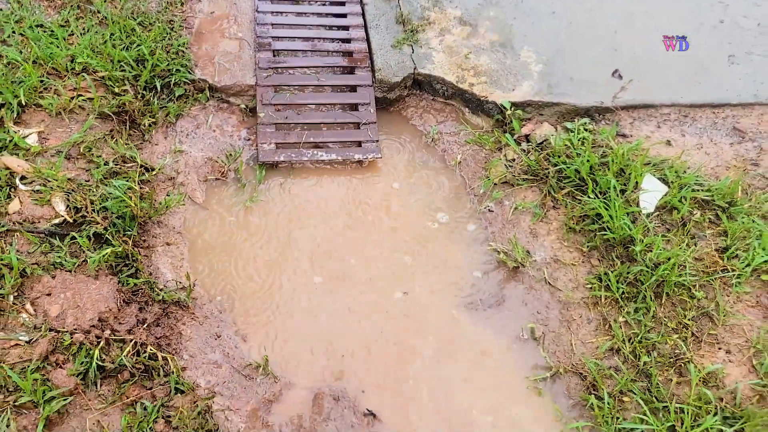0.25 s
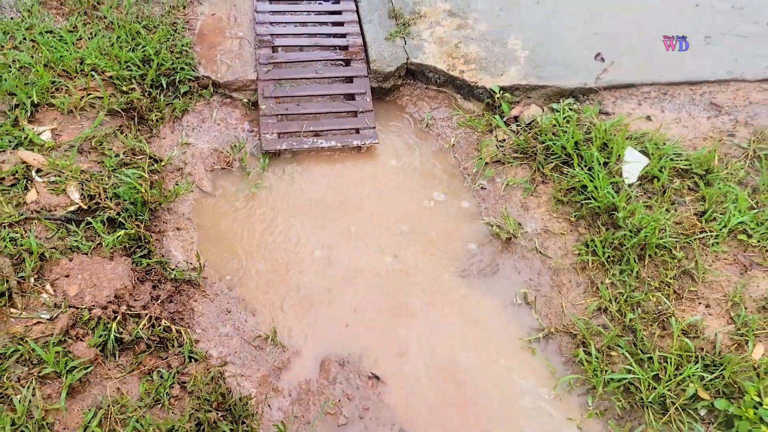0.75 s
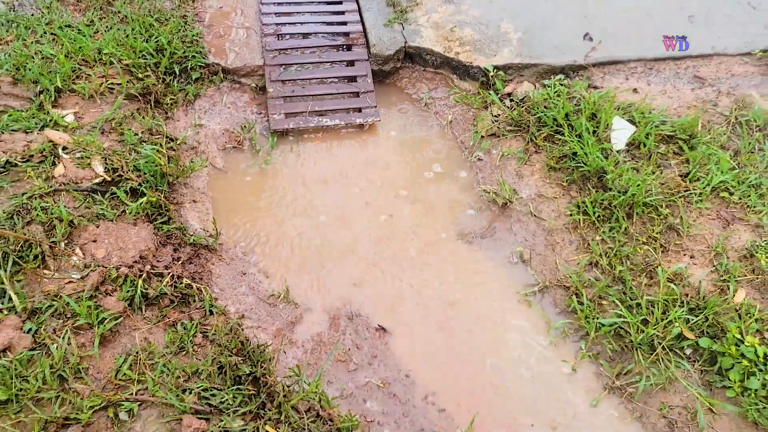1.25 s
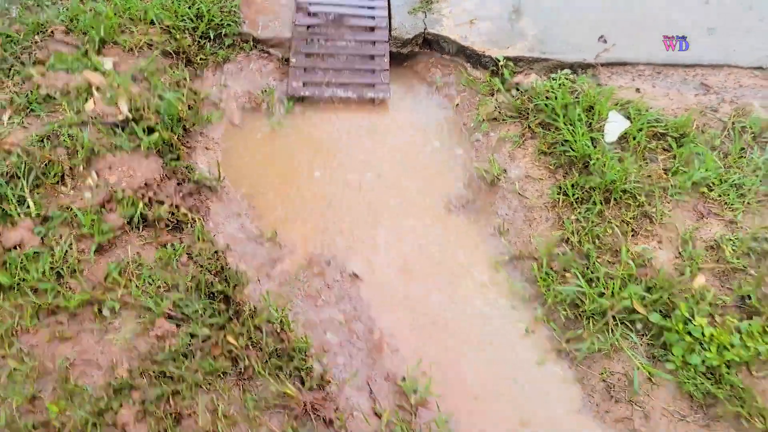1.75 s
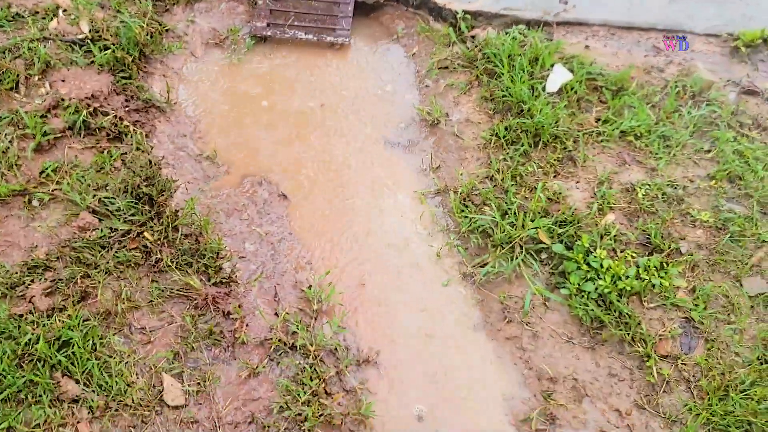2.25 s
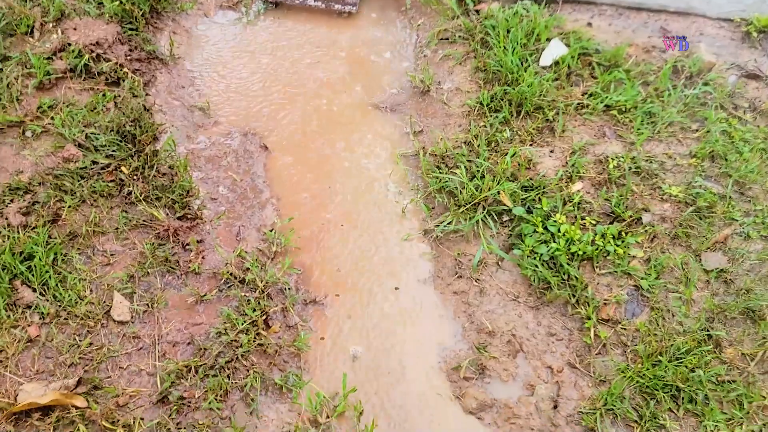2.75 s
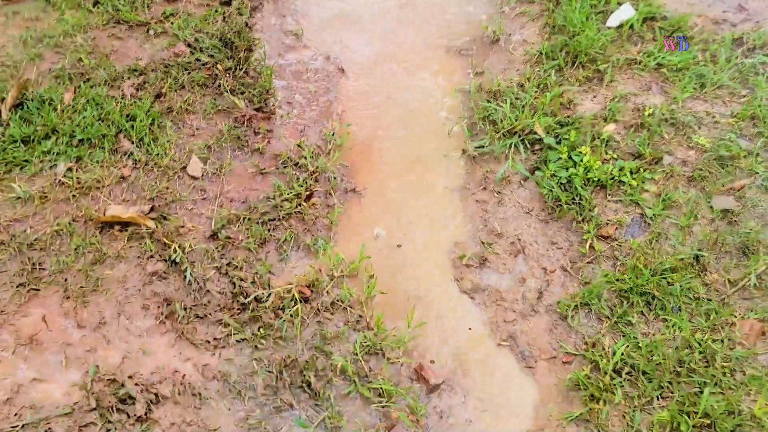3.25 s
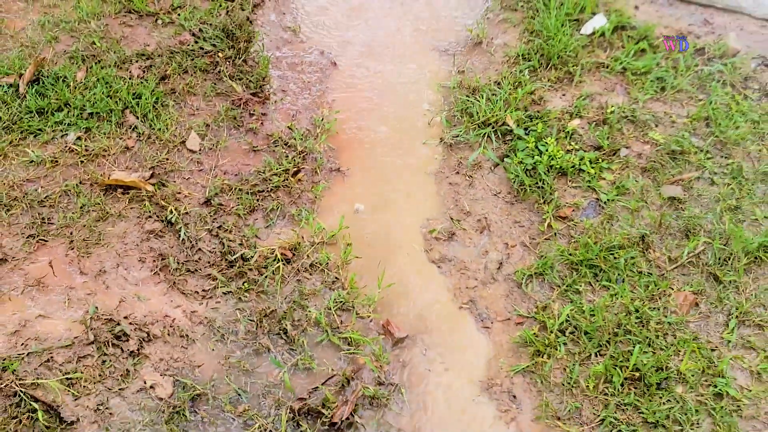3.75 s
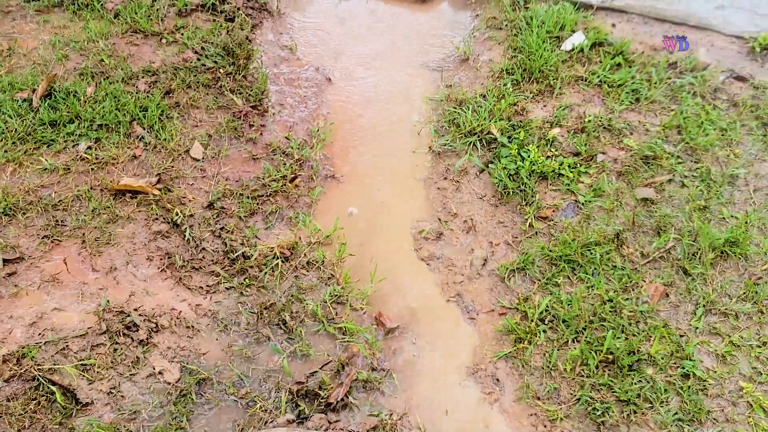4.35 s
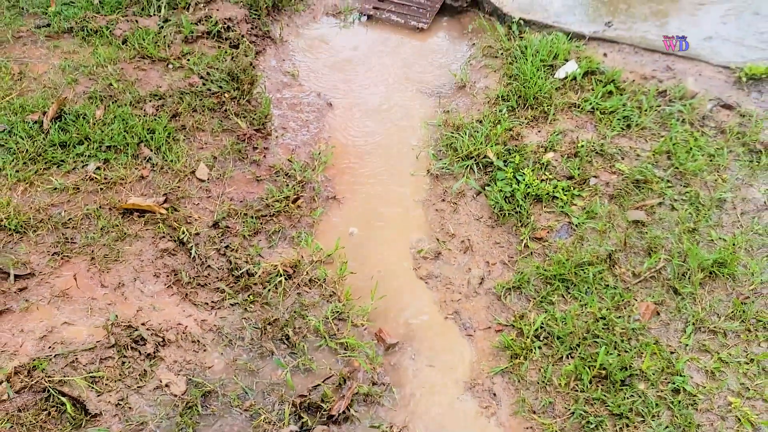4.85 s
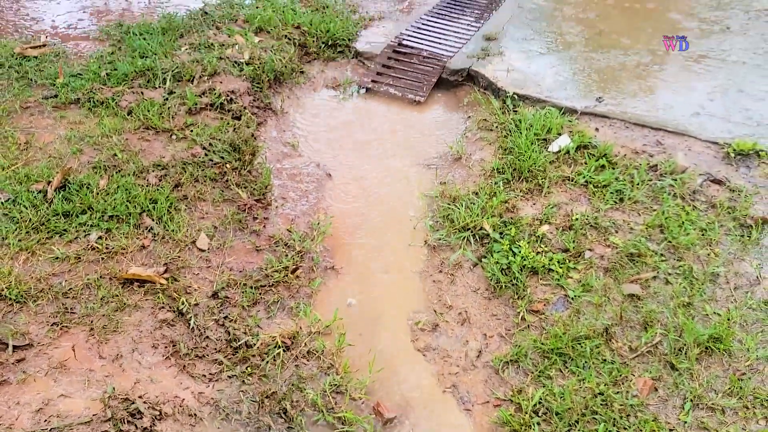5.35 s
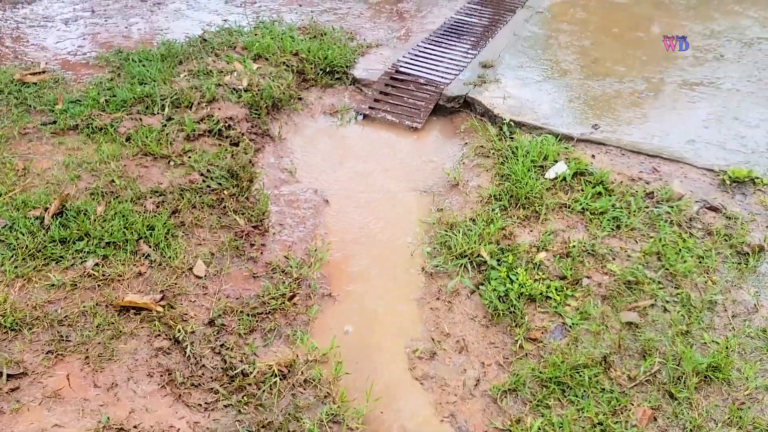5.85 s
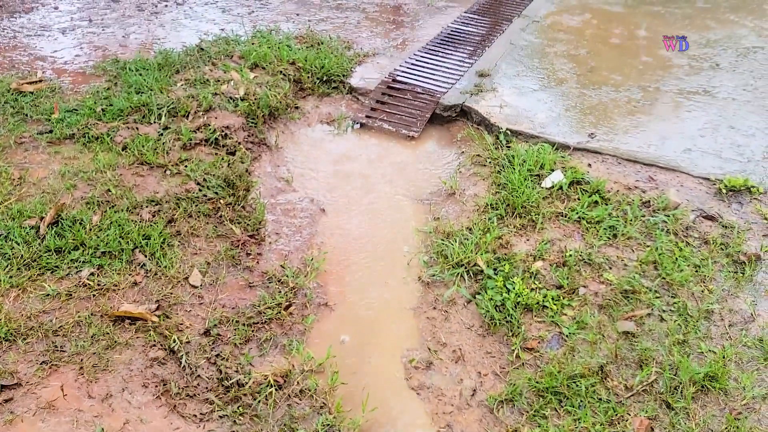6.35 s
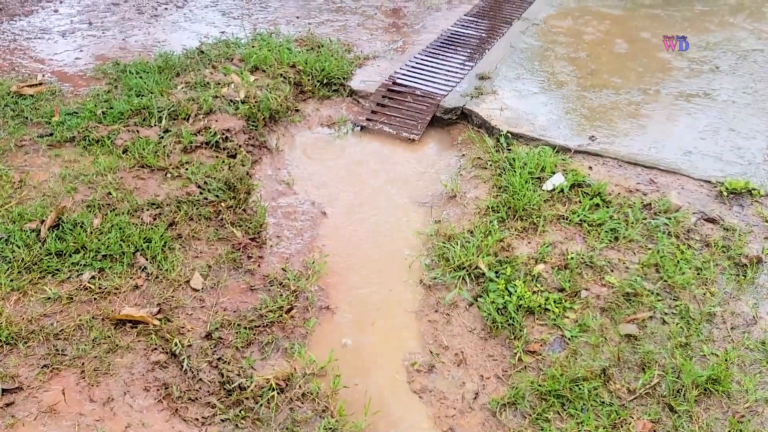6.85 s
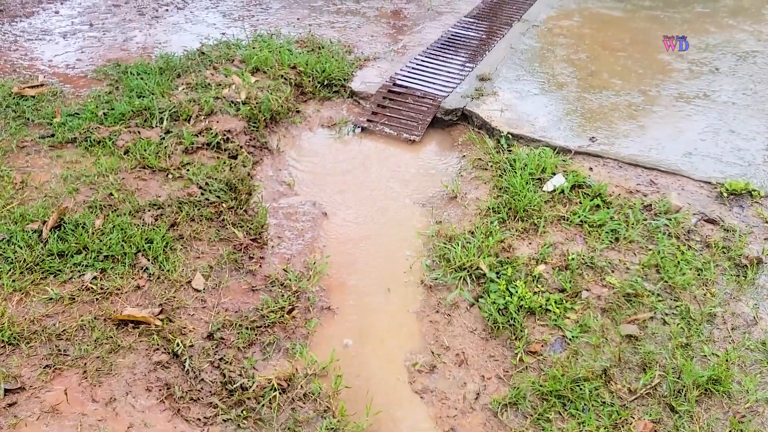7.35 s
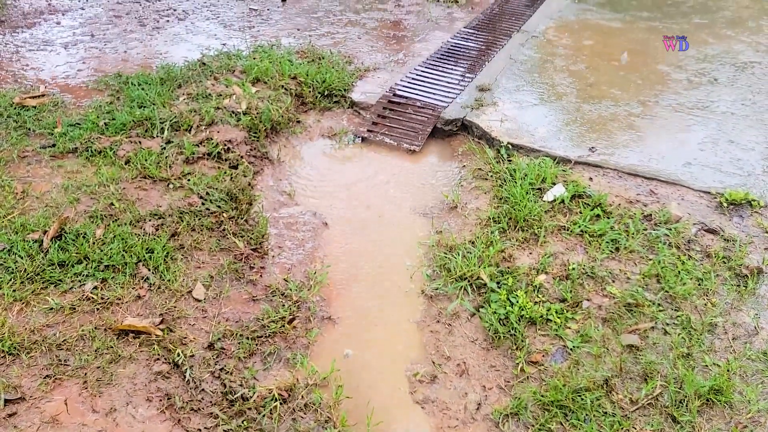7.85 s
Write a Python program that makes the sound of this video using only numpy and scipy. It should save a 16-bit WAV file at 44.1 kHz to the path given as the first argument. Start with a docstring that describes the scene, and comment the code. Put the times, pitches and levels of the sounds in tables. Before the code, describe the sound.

Steady rain taps irregularly on an umbrella close overhead, over a constant hiss and faint plinks in a puddle.

```python
"""Rain under an umbrella

Steady rain on a puddle and wet ground, heard from under thin taut cloth. Each drop overhead launches
a dispersive wave: a sharp tap sweeps down into a flap and, for big drops, a boom. Countless far drops
merge into hiss, air bubbles ring in the puddle, and a faint low tone passes once. Two spaced
microphone ports pick up the sound, and an automatic gain control ducks after loud hits."""
import sys
import numpy as np
from scipy import signal
from scipy.fft import rfft, irfft
from scipy.io import wavfile
from scipy.ndimage import uniform_filter1d

SR = 44100
rng = np.random.default_rng(int(sys.argv[2]) if len(sys.argv) > 2 else 0)


def waveform_to_disk(signal):
    """Save audio, clipped to [-1, 1], as 16-bit WAV at the path in sys.argv[1]."""
    frames = np.transpose(np.atleast_2d(signal))
    scaled = np.clip(frames, -1, 1) * 32767
    samples = np.round(scaled).astype(np.int16)
    wavfile.write(sys.argv[1], SR, samples)


N = 358091
MIDDLE_HZ = 2000   # tap pitch of a typical drop


def from_db(db):
    """Amplitude ratio of a level: tenfold per 20 dB."""
    return 10 ** (np.asarray(db) / 20)


def at_hz(points, hz):
    """Interpolation of (frequency [Hz], value) points on a logarithmic frequency axis."""
    frequencies, values = np.transpose(points)
    return np.interp(np.log(hz), np.log(frequencies), values)


def rms_one(x):
    """Normalisation to unit mean power."""
    return x / np.sqrt(np.mean(x ** 2) + 1e-20)


def drift(corner_hz):
    """Low-pass filtered noise: a slow random fluctuation of unit power."""
    step = 40   # samples
    pole = np.exp(-2 * np.pi * step * corner_hz / SR)
    noise = rng.standard_normal(N // step + 2002)
    slow = signal.lfilter([1], [1, -2 * pole, pole * pole], noise)[2000:]
    return np.interp(np.arange(N) / step, np.arange(len(slow)), rms_one(slow))


def far_rain(flicker_db=1.98, clicks_per_s=500, click_spread_db=10.5, click_share=0.35):
    """Incoherent summation: distant impacts merge into grainy hiss, flickering in third-octave bands."""
    # spectrum of the hiss: (frequency [Hz], relative spectral level [dB])
    spectrum = [(25, -24), (40, -10), (70, 1.5), (130, -14.5), (200, -10.5), (420, -12.5), (800, -13),
                (1300, -9.5), (1900, -12), (2800, -18.5), (3600, -18), (4800, -20.5), (6850, -38),
                (12500, -38), (15800, -42)]
    # spaced ports hear the hiss in phase or opposed by turns: (frequency [Hz], correlation [-1 to 1])
    correlation = [(60, 0.81), (200, 0.75), (600, 0.13), (1200, 0.096), (1900, -0.74), (2850, 0.26),
                   (3600, -0.29), (6000, 0.027)]
    # balance of the hiss: (frequency [Hz], left minus right [dB])
    balance = [(60, -2), (500, -2), (2100, 2), (4600, -5.5), (7000, 4), (15000, -6.5)]
    # loudness of the far rain: (time [s], level [dB])
    loudness = [(0, -40.5), (2.5, -43), (6.5, -43), (8.12, -41)]
    common_flicker = drift(1.5)
    sizes = from_db(click_spread_db * np.minimum(rng.exponential(1, (2, N)), 6))
    signs = rng.choice([-1, 1], (2, N))
    clicks = rms_one(sizes * signs * (rng.random((2, N)) < clicks_per_s / SR))
    white = rng.standard_normal((2, 2, N)) + click_share * clicks
    hiss, edges = 0, 25 * 2 ** (np.arange(29) / 3)
    for k, (low, high) in enumerate(zip(edges, edges[1:])):
        band = signal.butter(2, [low, high], "band", fs=SR, output="sos")
        mid, side = signal.sosfilt(band, white[k % 2])
        hz = np.sqrt(low * high)
        alike, lean = at_hz(correlation, hz), from_db(at_hz(balance, hz) / 2)
        pair = np.sqrt(1 + alike) * mid + np.sqrt(1 - alike) * side * [[1], [-1]]
        gain = from_db(at_hz(spectrum, hz) + flicker_db * (.5 * common_flicker + drift(22.5)))
        hiss = hiss + gain * pair * [[lean], [1 / lean]]
    hiss = signal.sosfilt(signal.cheby2(12, 40, 15950, fs=SR, output="sos"), hiss)
    # narrow resonance in the hiss: (frequency [Hz], bandwidth [Hz], boost [dB])
    sizzle = (2760, 310, 8.2)
    hz, width_hz, boost_db = sizzle
    resonance = signal.lfilter(*signal.iirpeak(hz, hz / width_hz, fs=SR), hiss)
    hiss = hiss + (from_db(boost_db) - 1) * resonance
    level_db = np.interp(np.arange(N) / SR, *np.transpose(loudness))
    return from_db(level_db) * rms_one(hiss)


def fine_drops(per_s, strength_db, spread_db, boom_db, flap_db, crisp_db):
    """Poisson process: fine drops land independently, each with its own levels, pitch and balance."""
    luck = rng.standard_normal((200, 6))
    times = np.cumsum(rng.exponential(1, 200)) / per_s
    levels = np.array([strength_db, boom_db, flap_db, crisp_db]) + spread_db * luck[:, :4]
    pitch_hz, pan_db = MIDDLE_HZ * np.exp(0.49 * luck[:, 4]), 5.3 * luck[:, 5]
    return np.column_stack([times, levels, pitch_hz, pan_db])[times < N / SR]


def impact_spectrum(hz, drop, luck, tap_peak_db=7.5, sharpness=3.5):
    """Source and filter: a drop's broad spectrum [dB], shaped by the resonances of the cloth."""
    # centres of boom, flap, knock, tap and spray: (frequency [Hz])
    part_hz = [90, 310, 1100, 3500, 9500]
    # response of cloth and microphone: (frequency [Hz], gain [dB])
    cloth = [(25, -40), (50, -9.5), (80, -1.5), (150, -6.5), (1400, -6), (2750, -6.5), (7500, -5.5),
             (12500, -5), (16500, -10.5)]
    # modes of the cloth panels: (frequency [Hz], mean boost [dB])
    modes = [(345, 5), (660, 4.5)]
    _, strength_db, boom_db, flap_db, crisp_db, pitch_hz, _ = drop
    octaves = np.log2(pitch_hz / MIDDLE_HZ)   # a higher drop is brighter
    knock_db = 1.5 * octaves + 0.063 * flap_db   # a wide flap fills the knock
    tap_db = -7 + 0.5 * octaves + 0.16 * crisp_db   # a crisp splash sharpens the tap
    spray_db = -26.5 + crisp_db
    parts_db = strength_db + np.array([boom_db, flap_db, knock_db, tap_db, spray_db])
    level_db = at_hz(list(zip(part_hz, parts_db)), hz) + at_hz(cloth, hz)
    level_db += tap_peak_db / (1 + (sharpness * np.log(hz / pitch_hz)) ** 2)
    tuning = 1 + 0.25 * (luck[2] - .5)   # panels differ in size
    for (mode_hz, mode_db), share in zip(modes, luck):
        level_db += (.5 + share) * mode_db / (1 + (sharpness * np.log(hz / tuning / mode_hz)) ** 2)
    return level_db


def causal(level_db):
    """Causality: the minimum-phase spectrum of a level curve sounds nothing before the blow."""
    cepstrum = irfft(level_db * np.log(10) / 20)
    half = cepstrum.shape[-1] // 2
    cepstrum[..., 1:half] *= 2
    cepstrum[..., half + 1:] = 0
    return np.exp(rfft(cepstrum))


def echoes(noise, fade_s, gain):
    """Diffuse decay: the spectrum of a cloud of echoes that dies exponentially."""
    fade = np.exp(-np.arange(len(noise)) / SR / fade_s)
    return gain * rfft(noise * fade) / np.sqrt(np.sum(fade ** 2))


def scattering(hz, noise):
    """Scattering at ribs and seams adds treble echoes and a bass shudder; thrown water patters back."""
    treble = echoes(noise[0], fade_s=.0008, gain=1.464) / (1 + (1070 / hz) ** 2)
    shudder = echoes(noise[1], fade_s=.004, gain=1.38) / (1 + (hz / 296) ** 2)
    patter = echoes(noise[0, ::-1], fade_s=.012, gain=0.45) / (1 + (1.8 * np.log(hz / 520)) ** 2)
    return 1 + treble + shudder + patter


def cloth_hits(drops, port_lag_s=0.0003, bass_lag_rad=1.16, flip_hz=196.5, size=3072):
    """Dispersion: bass travels more slowly in air-loaded cloth, so each impact sweeps downward."""
    out = np.zeros((2, N + size))
    hz = np.maximum(np.arange(size // 2 + 1) * SR / size, 10)
    chances = rng.random((len(drops), 4))
    noises = rng.standard_normal((len(drops), 2, 2, size))
    for drop, luck, noise in zip(drops, chances, noises):
        start_s, pan_db = drop[0], drop[-1]
        cycles = 0.654 * (0.63 + 0.619 * luck[3])   # group delay = cycles / frequency
        dispersion = np.exp(-2j * np.pi * cycles * np.log(hz / 10200))
        pulse = causal(impact_spectrum(hz, drop, luck)) * dispersion * SR / np.sqrt(2)
        balance_db = at_hz([(90, 0.46 * pan_db - 3), (300, pan_db - .8)], hz)   # the boom leans right
        for side, sign in enumerate((1, -1)):
            # the far port hears the drop later, the slow boom later still
            farness = (1 - sign * np.tanh(pan_db / 2.48)) / 2
            phase = farness * (2 * np.pi * hz * port_lag_s + bass_lag_rad / (1 + (hz / flip_hz) ** 2))
            # above the boom, left and right are in opposite phase, so the drop sounds wide
            phase += side * np.pi / (1 + (flip_hz / hz) ** 3)
            port = from_db(sign * balance_db / 2) * np.exp(-1j * phase)
            out[side, round(start_s * SR):][:size] += irfft(pulse * port * scattering(hz, noise[side]))
    return out[:, :N]


def bubbles(per_s, level_db, low_hz, high_hz, decay_cycles, rise, size=2048):
    """Bubble resonance: air trapped by drops in the puddle rings in damped tones that creep upward."""
    # the most prominent bubbles: (time [s], frequency [Hz], level [dB])
    plinks = [(.949, 1320, -25), (.955, 1190, -31), (3.296, 1430, -26), (5.15, 875, -31)]
    luck = rng.random((400, 4))
    times = np.cumsum(rng.exponential(1, 400)) / per_s
    pitches = low_hz * (high_hz / low_hz) ** luck[:, 0]
    faint = np.column_stack([times, pitches, level_db - 8.2 * luck[:, 1]])[times < N / SR]
    out, t = np.zeros((2, N + size)), np.arange(size) / SR
    for (start_s, hz, db), (_, _, pan, lag) in zip(np.vstack([plinks, faint]), luck):
        cycles = hz * t
        envelope = (1 - np.exp(-cycles / 0.29)) * np.exp(-cycles / decay_cycles)
        for side, sign in enumerate((1, -1)):
            tone = np.sin(2 * np.pi * (cycles + rise * cycles ** 2 + side * lag))
            gain = from_db(db + sign * 2 * (pan - 0.5))
            out[side, round(start_s * SR):][:size] += gain * envelope * tone
    return out[:, :N]


def hum():
    """Amplitude modulation: a faint pure tone swells and fades once."""
    # the low tone: (start [s], end [s], frequency [Hz], peak level [dB])
    tone = (4.5, 5, 365, -55)
    start_s, end_s, hz, db = tone
    t = np.arange(N) / SR
    progress = np.clip((t - start_s) / (end_s - start_s), 0, 1)
    envelope = np.sqrt(np.sin(np.pi * progress) + 1e-12)
    return from_db(db) * envelope * np.sin(2 * np.pi * hz * t)


def scene():
    """Superposition: far hiss, drops overhead, bubbles and the low tone add as pressures."""
    # distinct drops on the cloth: (time [s], strength [dB], boom re strength [dB],
    # flap re strength [dB], crispness [dB], tap pitch [Hz], left minus right [dB])
    drops = [(0.04, -97, 10, 10, 0, 3520, -6), (0.059, -94, 0, 0, 2, 3500, 0),
             (0.068, -88, 13, 11, 2, 3330, 3), (0.076, -86, 16.0, 18.5, 9, 2920, 0),
             (0.092, -84, 35.5, 23, -10, 1250.0, 2), (0.136, -95, 10, 1, 11, 1460.0, 1),
             (0.156, -75, 8, 17, 0, 1540, -0.5), (0.167, -73, 9, 6, 4.5, 5160, 1.5),
             (0.248, -82.5, -3, 0, 1.5, 1120, -12.5), (0.289, -87.5, 6, 7, 1, 4180.0, 6),
             (0.311, -88, -5, 18, 0, 3410.0, -0.5), (0.318, -78.5, 4, 10.5, -0.5, 1450, -12),
             (0.423, -89.5, -4, 7, 2, 1470, 2.5), (0.537, -78.5, -4, 6.5, -3, 2300, -3.5),
             (0.591, -79, -3, 10.5, -1, 1620, 10), (0.723, -85, 6, -6, -4, 2430, 1),
             (0.74, -72.5, 12, 7, -4, 1560, -1), (0.812, -86.5, -1, 18.5, 3, 4840.0, 3.5),
             (0.886, -80, -14, 6.5, -25, 1070, 3.5), (1.001, -85, -14, -3, -4, 2680, -9),
             (1.011, -96, -0.5, 3, 16, 3500.0, 2), (1.083, -85.5, -29, 6, 7, 2830, -1.5),
             (1.132, -92.5, 10, 4, 2, 3300, -2.5), (1.189, -91.5, 16.5, 11, -1, 2100, -4),
             (1.228, -80.5, -8, 2, 8, 1910, 5), (1.267, -85, 8, 17, 2, 2890.0, -1),
             (1.271, -73, 4, 2, -12, 1290, 2), (1.307, -73, 11, 10, -20, 930, 2.5),
             (1.311, -77.5, 9.5, 6.5, -9, 1360, 4), (1.373, -75.5, 10.5, 5, -3, 2210, -1.5),
             (1.477, -79.5, -9, 18.5, 4, 1320, 9), (1.482, -88, -6, 19, -6, 1370, 10),
             (1.586, -87, 23, 20.5, -2, 1710.0, 0), (1.6, -78.5, 18, 6, 5, 2170, -0.5),
             (1.668, -83.5, 19, 17, 4, 2670, 3), (1.674, -70, 19.5, 6, -17, 1330, 2),
             (1.706, -78.5, 20, 10, 2, 1720, 14), (1.725, -81, 15, 18.5, 3, 1560, -4),
             (1.839, -92.5, 4, 8, 11, 2680.0, 7), (1.892, -83.5, -1, -1, 5, 4890.0, 3.5),
             (1.916, -72, 13, 7.5, -3, 1580, 3.5), (1.933, -83.5, 6, 5.5, 7, 960.0, -5.5),
             (1.943, -85, 15, 12, 10, 3250.0, 0.5), (2.025, -75.5, 3, 0, -1, 2260.0, -0.5),
             (2.038, -76.5, 11, 4.5, -2, 1010, 3), (2.074, -94, 0, 18, -1, 1540.0, 4),
             (2.131, -87.5, 28.5, 21.5, -5, 1080, -14), (2.212, -71.5, -5, 5, 6.5, 3140, -1),
             (2.317, -77.5, -14.0, -13, 2.5, 1970, 1.5), (2.335, -79.5, -4, 3.5, -14, 1420, 1.5),
             (2.369, -85.5, 16, 19.5, -2, 2530.0, -2), (2.415, -86, 2, 9, -4, 2160, 0),
             (2.45, -70.5, -13, 0, -1, 2530, 2.5), (2.457, -80.5, 1, 14.5, 2, 2330.0, 0.5),
             (2.476, -70, -8, -4, -14, 2360, 0), (2.5, -92.5, -4, 5, 12, 960.0, -4),
             (2.515, -79, -13, -6, 1, 3470, 5.5), (2.548, -94, -8, -27, -2.0, 1540.0, -2),
             (2.682, -91.5, 22, 36.5, 6, 2230.0, 5), (2.695, -79.5, 8, 15.5, -3, 1190, -10),
             (2.705, -83, 9, 10, 3, 1660, 0.5), (2.73, -91, -1, 2, 4, 3500, -1),
             (2.756, -81.5, 7, 15.5, 2.5, 1410, 1.5), (2.82, -85.5, -13, 22, 9, 3430.0, 9.5),
             (2.826, -85.5, -8, 2, 11, 2600, -5.5), (2.87, -91, -16, 5, -1, 2640.0, -4),
             (2.904, -90.5, -6, 18, -3, 2150.0, 5), (2.937, -76.5, 2, 11, 6, 2830, -2.5),
             (2.949, -79.5, 20, 16, -2, 1460, -2), (2.977, -80, -1, 7, 14, 2230, 0.5),
             (3.005, -87, 0, 2, -4, 2360.0, 2.5), (3.118, -73.5, 10.5, 5, -7, 4020, 2.5),
             (3.131, -78, 11, 19.5, 7, 1620, -1.5), (3.141, -86.5, 9, -3, 5, 1800.0, 13),
             (3.147, -74.5, -2, -8, 3, 980, 0), (3.172, -75.5, 11.5, 11, -3, 1440, 0.5),
             (3.222, -76, -5, -3, -0.5, 2560, 1), (3.272, -96, 12, 17, 2, 1830.0, -1.5),
             (3.408, -78, -8, -1, -4, 1750, 0.5), (3.806, -73, -27, 0, -1.5, 1310, -1),
             (3.823, -79.5, -4, 9, 0, 910, -5), (3.855, -87, -16, 16, 8, 1790, 4),
             (3.91, -82.5, 5, 12.5, 21.5, 3000, 4), (3.988, -74, -16, 1, 6.5, 2130, -0.5),
             (4.017, -73, -4, 9, -2, 970, 5), (4.1, -94.5, 9.5, 21, 11, 970, -2.5),
             (4.116, -94, -4, -2, -20.0, 1800.0, 5), (4.244, -80.5, -9, 9.5, 5, 3230, -1.5),
             (4.305, -71.5, -18, -1.5, 4.5, 1260, 0), (4.339, -80.5, 3, 0, -12.0, 2730.0, 5.5),
             (4.36, -75.5, 10, 14, 10.5, 2810, 2.5), (4.46, -91, -5, -16, 0, 2660, 0),
             (4.485, -88.5, -6, 9, -7, 1470, 14), (4.494, -83.5, -5, -1, 8, 2180, -4.5),
             (4.618, -99, 18, 16, 5, 1300, -1), (4.675, -84.5, -2, -15, -7, 1900, 4),
             (4.762, -75.5, 18, 14, 1.5, 1270, 11.5), (4.789, -78, 9, 13.5, -3, 1740, -1.5),
             (4.808, -94.0, 4, 8, -11, 1520.0, -6), (4.833, -69, -20, -3.5, -13, 1730, 0),
             (5.126, -91.5, 0, 1, -10, 1270.0, -11), (5.189, -86.5, 12, 2.5, -8, 2180, -4.5),
             (5.297, -86, 27, 20.5, 7, 2700, -8.5), (5.309, -85, 19, 7, 2, 1430, 3.5),
             (5.353, -76, 9, 24.5, -6, 4540, 2.5), (5.38, -94, 0, 0, -8, 1500, 0.5),
             (5.386, -90, 13, 14, 6.5, 5030, -1.5), (5.487, -67, 10.5, -0.5, -5, 1400, -2.5),
             (5.61, -78, -4, 19, 1, 2180, 11.5), (5.72, -82.5, 3, 13, 13, 2820, -1.5),
             (5.8, -79.5, -25, 16.5, -0.5, 2180, 11), (5.826, -83, 19, 18.5, -3, 1580.0, -2.5),
             (5.863, -83, 27, 22, -12.0, 1600, -13.5), (5.927, -81, -13, 6.5, 9.5, 5200, 5),
             (5.937, -86.5, 0, 7, 11, 1460, 0), (6.001, -94, 26, 22, -13, 1170.0, 13.5),
             (6.052, -93.5, 0, 17, 18.5, 3390.0, -1.5), (6.07, -89.5, -5, 5, -0.0, 960.0, 2),
             (6.165, -79, -11, 6.5, -0.5, 1030, 12.5), (6.201, -86.5, -9, -16, -7, 1890.0, -0.5),
             (6.257, -69.5, -12, -0.5, -1, 1530, -2.5), (6.278, -91, 8, -2, 3, 3700.0, 6.5),
             (6.297, -82, -8, 18.5, -14, 1180, -5), (6.3, -78.5, -3, 18.5, -3, 1110, 1.5),
             (6.451, -86, 13.5, 21, -4, 2630, 1.5), (6.524, -75, -17, 3.5, 8.5, 2690.0, -1),
             (6.599, -83, 2, 5, 7, 1640.0, 8.5), (6.648, -78, 25.5, 23.5, 1, 1500, 5),
             (6.665, -86, 11, 9.5, 2, 1300, -18), (6.812, -76, -16, -5.5, 0, 2760, -3),
             (6.844, -88.5, -8, 11, -5, 3120, -0.5), (6.942, -71, -21, 4, -16, 1120, 2),
             (6.951, -78, -4, 8.5, 2, 950, -4.5), (7.056, -92, 10, -7.5, 2, 2780.0, -7),
             (7.08, -92.5, 2, 17, 2, 3000, 7), (7.189, -80.5, -0.5, 2, 6, 1220, 0.5),
             (7.279, -75.5, -12, 4.5, -1, 1130, -2), (7.301, -73.5, -8, 5, 7, 1930, -0.5),
             (7.393, -78, -19, 6.5, 1.5, 1230, 11), (7.561, -81, -15.0, -10.5, -1, 2930, 9.5),
             (7.759, -86.5, 9, 17, -7, 1410, -1.5), (7.83, -77.5, 18.0, 11, -6, 990, -1),
             (7.971, -81.5, 3, 4, -11, 1740, 3), (7.995, -79.5, -19, 10.5, 4, 3000, -5),
             (8.065, -87, 1, 6.5, 1, 3360, -13.5)]
    fine = fine_drops(per_s=12, strength_db=-104, spread_db=3.5, boom_db=13, flap_db=4.5, crisp_db=-7)
    hits = cloth_hits(np.vstack([drops, fine]))
    puddle = bubbles(per_s=7.1, level_db=-44, low_hz=714, high_hz=3280, decay_cycles=7.4, rise=0.0011)
    return far_rain() + hits + puddle + hum()


def gain_control(x, knee_db, slope, release_db_s, attack_s):
    """Dynamic compression: levels above the knee turn the gain down; it recovers at a steady rate."""
    power = uniform_filter1d(np.mean(x ** 2, axis=0), size=128)
    excess_db = np.maximum(10 * np.log10(power + 1e-12) - knee_db, 0)
    recovery_db = release_db_s * np.arange(N) / SR
    cut_db = np.maximum.accumulate(slope * excess_db + recovery_db) - recovery_db
    pole = np.exp(-1 / (attack_s * SR))
    return x * from_db(-signal.lfilter([1 - pole], [1, -pole], cut_db))


def record(dry):
    """Compression ducks loud hits, soft saturation rounds the peaks, and a low-pass limits the band."""
    ducked = gain_control(dry, knee_db=-22.5, slope=0.16, release_db_s=5, attack_s=0.049)
    rounded = 0.67 * np.tanh(ducked / 0.82)
    return signal.sosfilt(signal.cheby2(12, 70, 16950, fs=SR, output="sos"), rounded)


dry = scene()
out = record(dry)
waveform_to_disk(out)
```